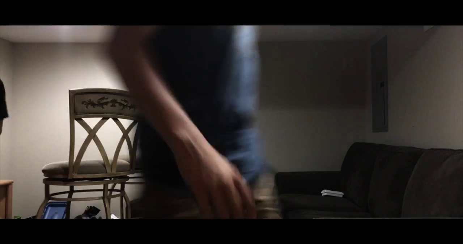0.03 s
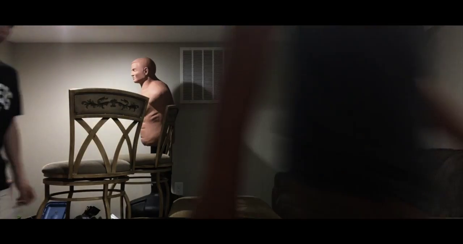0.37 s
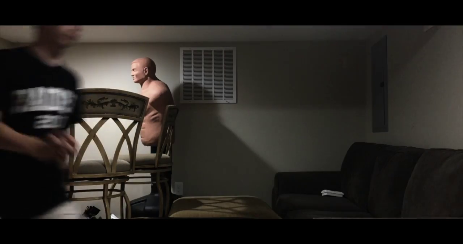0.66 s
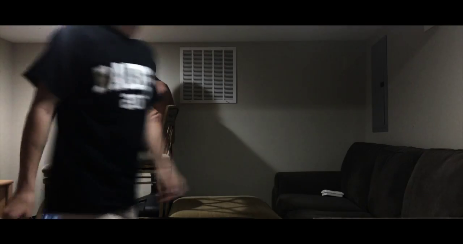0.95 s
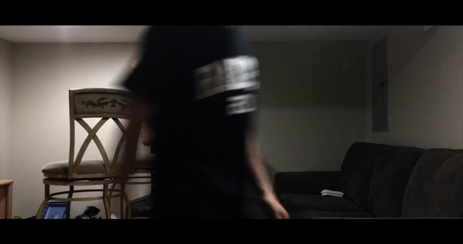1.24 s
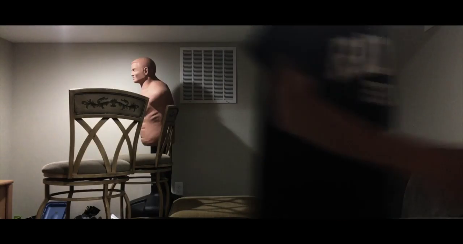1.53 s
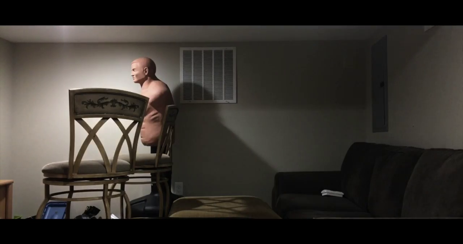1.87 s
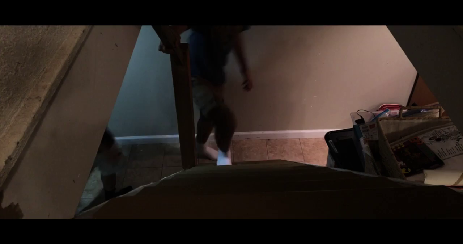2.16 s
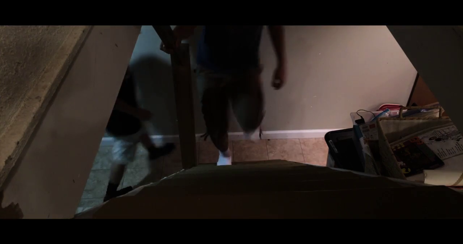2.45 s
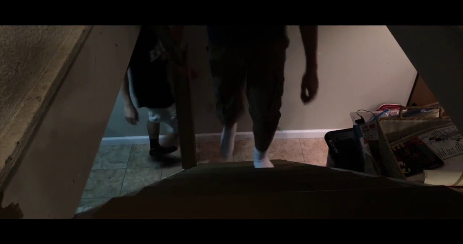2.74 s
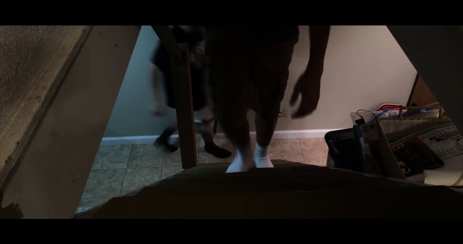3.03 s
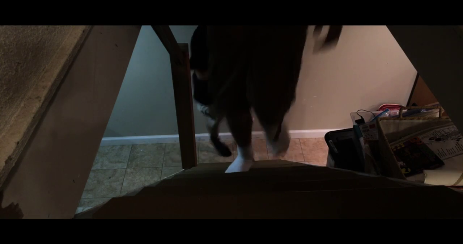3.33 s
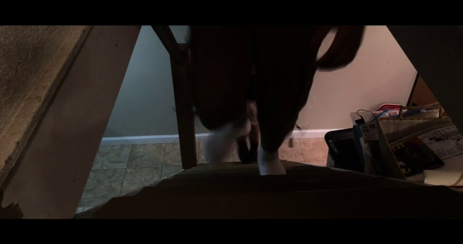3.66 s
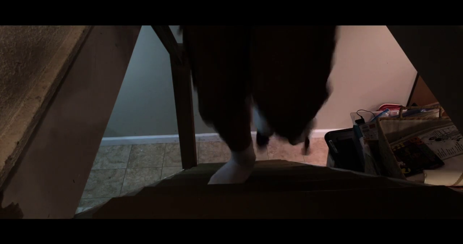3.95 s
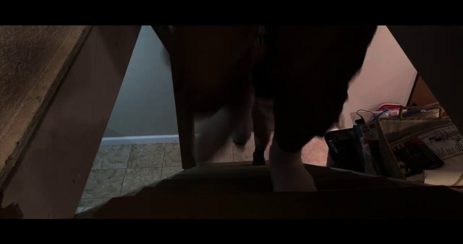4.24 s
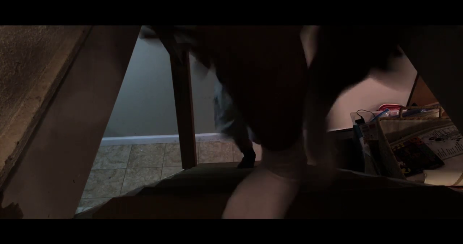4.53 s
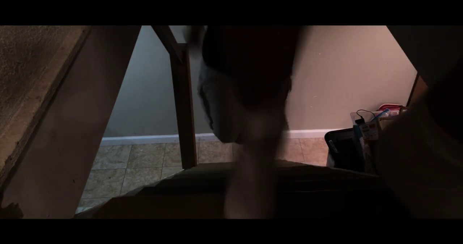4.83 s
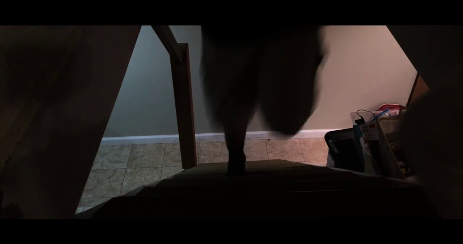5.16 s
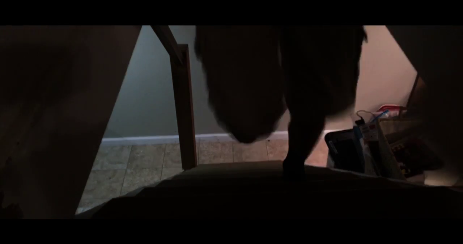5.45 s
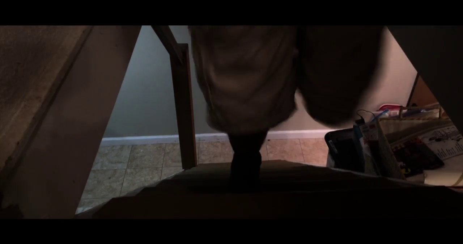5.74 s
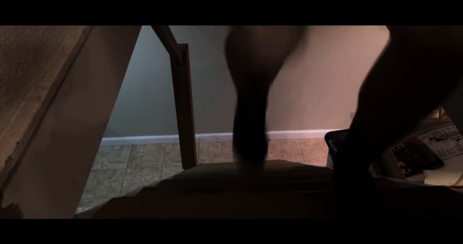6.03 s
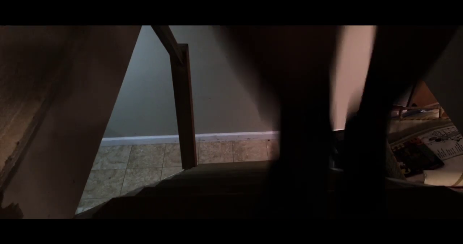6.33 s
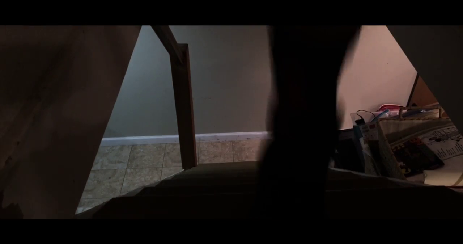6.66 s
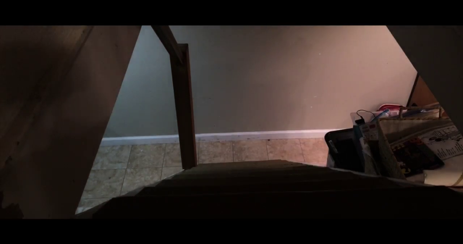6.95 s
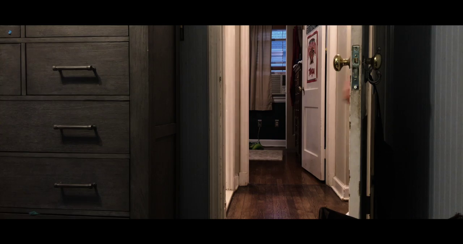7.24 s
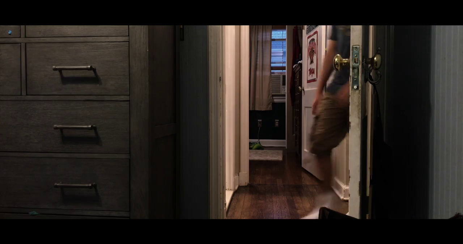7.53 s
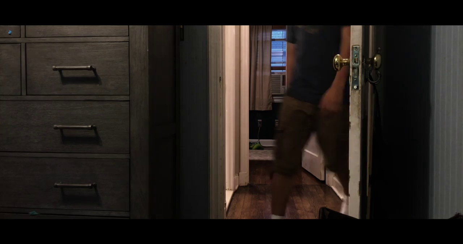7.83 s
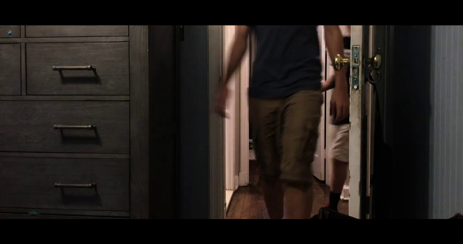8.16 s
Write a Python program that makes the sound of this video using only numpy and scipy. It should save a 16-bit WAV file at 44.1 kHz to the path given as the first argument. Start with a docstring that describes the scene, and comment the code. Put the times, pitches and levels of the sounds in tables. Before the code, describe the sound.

Over a faint indoor hum, soft footfalls give way to sharp cracks of wood and uneven, muffled thuds as two people in socks come up a staircase toward the microphone. The steps grow closer and drier, with rustling trousers and one deep boom from a heavy heel. After a faint click the hum drops, and low, booming steps continue on a wooden floor.

```python
"""Soft, thudding footsteps and cracking wood: two people in socks cross a basement and climb a carpeted
wooden staircase close past the listener; with a faint click the sound switches abruptly to the wooden
floor upstairs. Each footfall on the stairs thuds on a tread, knocks its boards and sets the flight
swaying; joints crack under the load, and heavy heels make the joists boom. Socks and trousers swish
between the steps, over a faint house hum."""
import sys
import numpy as np
from scipy import signal
from scipy.fft import rfft, irfft
from scipy.io import wavfile

SR = 44100
rng = np.random.default_rng(int(sys.argv[2]) if len(sys.argv) > 2 else 0)


def master_out(mix):
    """Clip the mix to full scale and print it as 16-bit PCM to the path in sys.argv[1]."""
    frames = np.transpose(np.atleast_2d(mix))
    ceiling = np.clip(frames, -1, 1)
    pcm = np.round(ceiling * 32767).astype(np.int16)
    wavfile.write(sys.argv[1], SR, pcm)


N = 369999

# ball and heel of each foot landing:
# (time [s], thud [dB], tread pitch [Hz], flex of the flight [dB], board knock [dB])
FOOTFALLS = [(1.534, -26, 202, -26.5, -27.5), (1.593, -29, 170, -22.5, -34.5), (2.115, -21, 211, -31, -24),
             (2.13, -11.5, 112, -16, -22.5), (2.235, -20.5, 142, -25.5, -30), (2.262, -25.5, 124, -18, -40),
             (2.713, -9.5, 163, -18, -22.5), (2.737, -17, 158, -15.5, -30), (3.096, -30, 187, -36, -42.5),
             (3.117, -29, 238, -46, -39.5), (3.461, -27, 300, -33, -28.5),
             (3.497, -19.5, 112, -15.5, -26.5), (3.53, -19.5, 114, -16.5, -30),
             (3.731, -34, 134, -31, -37.5), (3.79, -27.5, 124, -39, -32.5), (3.822, -13.5, 186, -25, -31),
             (4.146, -26, 139, -22, -32), (4.206, -8.5, 138, -22, -21.5), (4.424, -30.5, 225, -32, -54),
             (4.516, -24, 138, -32, -35), (4.759, -8.5, 161.5, -27.5, -22.5), (4.805, -22, 183, -44, -31),
             (4.853, -15.5, 227, -23.5, -22), (4.873, -17, 181, -38, -52), (5.021, -26, 224, -21.5, -32.5),
             (5.046, -24.5, 106, -37, -30), (5.073, -29, 132, -25, -35), (5.346, -8, 176, -20.5, -20),
             (5.451, -16, 128, -11, -28), (5.673, -14, 131, -27, -28), (6.034, -10, 135, -27, -19),
             (6.19, -24, 134, -30, -38.5), (6.388, -13.5, 214.6, -28.5, -35), (6.405, -22, 219, -40, -36.5),
             (6.762, -28, 299, -32, -29.5), (6.786, -22, 293, -30, -33.5), (6.812, -28, 124, -34, -47),
             (7.22, -22.5, 155, -25, -41.5)]


def footsteps():
    """Each foot thuds on its tread, knocks the boards, flexes the flight and scuffs the carpet."""
    # modes of the flight, the boards and the hollow under the treads: (pitch [Hz], level [dB], t60 [s])
    flight_modes = [(35.05, -2, 0.9), (54.2, -5, 0.23), (72.16, 7.5, 0.4), (91, -22, 0.55)]
    board_modes = [(233.7, 1.5, 0.16), (283.5, 0, 0.062), (315.5, 1.5, 0.096), (356, 0.5, .12),
                   (420.3, -6, 0.1), (505, -5, 0.039), (627, -7, 0.063)]
    hollow_modes = [(121.6, 7, 0.13), (154.4, -8, 0.087), (187, -2, 0.09)]
    # tone of a sock on carpet: (frequency [Hz], level [dB])
    scuff_tone = [(200, -2), (450, 9), (800, 3.5), (1500, 2), (3000, -5.5), (6000, -13.5), (16000, -19)]
    firm_db, firm_rise_s, db_per_doubling = -26.5, 0.0028, 17.5
    treads, flight, boards, scuff = np.zeros((4, N))
    flex = ring(flight_modes, rise_s=0.0022)
    t = np.arange(SR // 2) / SR
    for s, thud_db, hz, flex_db, knock_db in FOOTFALLS:
        rise_s = firm_rise_s * 2 ** ((firm_db - knock_db) / db_per_doubling)  # gentler foot, slower attack
        add(treads, s, amp(thud_db) * thud(hz, load_s=0.0065, steep=1.65))
        add(flight, s, amp(flex_db) * flex)
        add(boards, s, amp(knock_db) * ring(board_modes, rise_s, detune=0.058))
        add(scuff, s, amp(knock_db - 11) * pulse(t, 1.1 * rise_s, fade_s=0.026))
    steps = amp(-1.5) * treads + amp(5) * boards + scuff * noise(scuff_tone)
    echo = stairwell(amp(-2.5 + 0.35 * echo_db(np.arange(N) / SR)) * steps)
    return steps + resonate(treads, hollow_modes) + amp(1.5) * flight + echo


def joist_booms():
    """A heavy heel bends the joists: a deep boom with a weaker, quicker overtone; the floor swings on."""
    # heavy heels: (time [s], level [dB], pitch [Hz])
    heels = [(0.532, -30.5, 41.6), (1.112, -32, 44.5), (1.557, -39, 75.5), (5.455, -11, 46),
             (6.795, -26, 40.5), (7.151, -34, 69.4), (7.226, -15, 58.3), (7.281, -22.5, 53.4),
             (7.63, -27.5, 63), (7.84, -17.5, 54), (7.937, -28, 55), (8.127, -19.5, 55.7),
             (8.178, -23.5, 71.5)]
    # modes of the joists: (pitch [Hz], level [dB], t60 [s])
    joist_modes = [(51.6, -6.5, 0.45), (65.5, -5.5, 0.63)]
    booms = np.zeros(N)
    for s, db, hz in heels:
        load_s = 1.04 / hz  # the full weight arrives in about one swing
        add(booms, s, amp(db) * thud(hz, load_s, steep=1.2))
        add(booms, s, amp(db - 21) * thud(hz * 2.44, load_s / 2, steep=0.71))
    return amp(-2) * booms + resonate(booms, joist_modes) + amp(-16.5) * stairwell(booms)


def cracks_and_click():
    """Short noise bursts, wetter when far off: wood joints slipping, then one click at the room switch."""
    # cracking wood; the last row is a faint dry click as the sound switches abruptly to the upstairs room:
    # (time [s], level [dB], relative treble [dB])
    bursts = [(1.1193, -26.5, -28), (1.5328, -20, -13), (1.5956, -21, -24), (1.651, -29.5, -15),
              (1.714, -33, -34), (2.075, -26.5, -22), (2.112, -15.5, -26), (2.2383, -24, -12),
              (2.3248, -14, -7.5), (2.359, -17.5, -14.5), (2.4536, -14, -11.5), (2.4593, -19.5, -30),
              (2.6122, -10, -8.5), (2.7142, -14.5, -18), (2.7671, -18.5, -6), (4.2025, -27, -35),
              (4.5476, -15, -14), (4.867, -16.5, -8), (4.8714, -17.5, -14.5), (5.447, -20, -11),
              (5.451, -10.5, -10.5), (5.4986, -24, -10), (5.671, -20, -15), (6.0343, -21, -26),
              (6.272, -24.5, -22), (6.3872, -22.5, -15.5), (6.4214, -19.5, -28), (6.488, -22, -27),
              (6.682, -26, -14), (6.7074, -23.5, -16), (6.7289, -26.5, -4), (6.758, -19, -22),
              (6.783, -15, -20), (6.8208, -34, -7), (6.862, -31, -8), (6.887, -20, -25.5),
              (7.1565, -31.5, -27)]
    # tone of a burst's body, its bright snap and its echo: (frequency [Hz], level [dB])
    body_tone = [(200, -27), (600, -3), (1000, 9), (1500, 3), (2400, 4), (4100, -8.5), (5500, -1.5),
                 (8000, -10.5), (16000, -30)]
    snap_tone = [(1500, -4), (4000, -0.5), (6000, -3), (7500, -7), (9000, -2.5), (10400, -9), (12000, -5.5),
                 (16000, -14.5)]
    echo_tone = [(200, -14), (600, -1.5), (1000, -4.5), (1400, 4.5), (2400, 0.5), (4400, -3.5),
                 (5400, -7.5), (8000, -13), (16000, -29)]
    # woody ring after a burst: (pitch [Hz], level [dB], t60 [s])
    ring_modes = [(1580, -8, 0.021), (1782, 8, 0.1), (2380, 10, 0.059), (2826, 9, 0.086), (3470, 11, 0.017),
                  (4170, 11, 0.027)]
    typical_db, typical_fade_s, db_per_doubling = -15.5, 0.0028, 16
    body, snap, body_echo, snap_echo = np.zeros((4, N))
    t = np.arange(SR // 2) / SR
    for s, db, treble_db in bursts:
        fade_s = typical_fade_s * 2 ** ((db - typical_db) / db_per_doubling)  # louder bursts last longer
        burst = pulse(t, 0.42 * fade_s, fade_s)
        add(body, s, amp(db) * burst)
        add(snap, s, amp(db + treble_db) * burst)
        wet_db = db + echo_db(s)
        # echoes add in power, and the treble dies first
        add(body_echo, s, (amp(wet_db) * pulse(t, rise_s=0.004, fade_s=0.04)) ** 2)
        add(snap_echo, s, (amp(wet_db + treble_db) * pulse(t, rise_s=0.004, fade_s=0.026)) ** 2)
    sound = amp(-7) * body * noise(body_tone) + amp(7.5) * snap * noise(snap_tone)
    sound += amp(-9.5) * np.sqrt(body_echo) * noise(echo_tone)
    sound += amp(1.5) * np.sqrt(snap_echo) * noise(snap_tone)
    return sound + amp(-10) * resonate(sound, ring_modes)


def flight_sway():
    """The loaded flight heaves with a low rumble, most at first, and every footfall rocks it further."""
    # tone of the heaving staircase: (frequency [Hz], level [dB])
    sway_tone = [(15, -12.5), (27, -8), (33, -2.5), (38, -12), (44, -7.5), (70, -21), (200, -41), (600, -73)]
    start_s, rise_s, sway_db, fade_db_per_s = 2.72, 0.049, -29.5, 3
    t = np.arange(N) / SR
    since = np.maximum(t - start_s, 0)
    power = (amp(sway_db - fade_db_per_s * since) * (1 - np.exp(-since / rise_s))) ** 2
    rock = amp(-11.5) * pulse(t[:2 * SR], rise_s=0.04, fade_s=0.16)
    for s, _, _, flex_db, _ in FOOTFALLS:
        add(power, s, (amp(flex_db) * rock) ** 2)
    return np.sqrt(power) * noise(sway_tone)


def knocks_and_squeaks():
    """Loose wood chatters on its neighbour, or a sock on the floor: a cluster of modes around one pitch."""
    # hollow knocks of loose boards and trim: (time [s], level [dB], pitch [Hz])
    knocks = [(.537, -46.5, 1330), (1.120, -35.5, 935), (1.535, -37, 950), (1.660, -39, 690),
              (1.728, -37.5, 910), (2.077, -39, 440), (4.205, -33.5, 676), (4.213, -30, 1390),
              (4.379, -46, 2020), (4.547, -37.5, 1010), (5.45, -26.5, 1700), (5.348, -33.5, 477),
              (5.451, -34.5, 970), (6.038, -36, 1050), (6.104, -46, 1170), (6.488, -41.5, 1480),
              (6.837, -50, 840), (6.886, -49, 910), (6.943, -51.5, 1400)]
    # socks squeaking on the wooden floor: (time [s], level [dB], pitch [Hz], t60 [s])
    squeaks = [(7.262, -47, 1420, 0.17), (7.279, -44, 2900, 0.11), (7.845, -54, 980, 0.2),
               (7.86, -53, 3520, .12), (8.126, -55.5, 1233, 0.97)]
    knock_cycles = 63  # swings until a knock has died by 60 dB
    hits = [(s, db, hz, knock_cycles / hz) for s, db, hz in knocks] + squeaks
    sound, t = np.zeros(N), np.arange(SR // 2) / SR
    for s, db, hz, t60 in hits:
        q = 3.8 + 0.013 * hz * t60  # the longer the ring, the narrower the cluster
        cluster = signal.lfilter(*signal.iirpeak(hz, q, SR), rng.standard_normal(len(t)))
        cluster = signal.lfilter(*signal.iirpeak(hz, Q=1.3, fs=SR), cluster)
        add(sound, s, amp(db - 60 * t / t60) * evened(cluster))
    return amp(4.5) * sound + amp(-9.5) * stairwell(sound)


def cloth():
    """Socks slide in strokes that start fast and ease off; trousers rub, and fibres catch and let go."""
    # socks sliding over carpet and floor: (time [s], length [s], slide [dB], fizz [dB])
    strokes = [(-.02, .13, -52, -62), (.42, 0.21, -56, -79), (0.529, 0.098, -63, -55.5),
               (0.87, 0.098, -58, -54.5), (1.131, 0.12, -57, -51), (1.648, 0.053, -38.5, -49),
               (1.698, 0.087, -36, -56), (1.899, 0.097, -53, -54), (3.18, 0.18, -40.5, -44.5),
               (3.376, 0.2, -42, -55.5), (3.474, 0.026, -42, -46), (3.523, 0.15, -39, -51.5),
               (4.525, 0.083, -53, -56), (4.784, 0.17, -40, -46), (4.93, 0.26, -44.5, -72),
               (5.387, 0.23, -55, -54), (6.25, 0.26, -49, -50.5), (6.967, 0.099, -80, -54),
               (7.256, 0.17, -40, -72), (7.483, 0.22, -51.5, -64), (7.596, 0.24, -46, -59),
               (7.798, 0.15, -44, -56.5), (8.016, 0.16, -56.5, -57.5), (8.096, 0.44, -56.5, -70)]
    # tone of trouser swish, sock slide and fibre fizz: (frequency [Hz], level [dB])
    swish_tone = [(150, 8), (350, 14.5), (500, 11), (630, 13), (820, -2), (1400, 8.5), (1850, -15),
                  (2170, -5), (2600, -24), (3600, 0), (4150, -2.5), (5200, -47), (9000, -19)]
    slide_tone = [(200, 10), (500, 2), (720, -2), (1100, -1.5), (1500, 1.5), (1900, -2.5), (2200, 0),
                  (2600, -3), (3000, -4.5), (3600, -5), (4200, -6), (5500, -12.5), (9000, -23)]
    fizz_tone = [(2000, 2.5), (4500, 0.5), (6500, 2), (9000, -1.5), (10400, -5), (12000, -1), (16000, -5)]
    # what a sliding sock rings between tread and riser: (pitch [Hz], level [dB], t60 [s])
    riser_modes = [(670, 10, 0.04), (1110, 4, 0.024), (2100, 4, 0.012), (4170, 6, 0.026)]
    on_stairs = np.interp(np.arange(N) / SR, [3.02, 3.08, 7.0, 7.17], [0, 1, 1, 0])
    legs = amp(-4) * on_stairs * trouser_rub()
    slide, fizz = np.zeros((2, N))
    for s, length_s, slide_db, fizz_db in strokes:
        progress = np.arange(SR // 2) / SR / length_s
        stroke = 1.034 * (1 - np.exp(-progress / 0.053)) * np.exp(-(progress / 0.75) ** 2.8)
        add(slide, s, amp(slide_db) * stroke)
        add(fizz, s, amp(fizz_db) * stroke)
    grip = amp(wander(rate_hz=43))
    catches = amp(2.2 * wander(rate_hz=880))
    trousers = (amp(-4) * legs + amp(-6) * on_stairs * slide) * noise(swish_tone)
    socks = amp(-3.5 * on_stairs) * slide * noise(slide_tone)  # the carpet swallows part of the hiss
    fibres = (legs + fizz) * noise(fizz_tone)
    rub = grip * catches * (trousers + socks + fibres)
    rub += resonate(on_stairs * slide * grip * noise(slide_tone), riser_modes)
    return rub + amp(-11) * stairwell(rub)


def trouser_rub():
    """Envelope of rubbing trouser legs: a steady bed that swells as each walker brushes past."""
    # close passes: (time [s], level [dB], time to cover their distance from the listener [s])
    passes = [(4.7, -50, 0.29), (6.55, -49, 0.1)]
    t = np.arange(N) / SR
    near_power = sum(amp(db) ** 2 / (1 + ((t - s) / span_s) ** 2) for s, db, span_s in passes)
    return np.sqrt(amp(-52) ** 2 + near_power)


def house_tone():
    """Air rumbles and hisses; a basement machine's hum gathers in the stairwell. All drop upstairs."""
    # tone of the air's rumble and hiss: (frequency [Hz], level [dB])
    rumble_tone = [(15, -4.5), (28, -7), (43, 2), (60, -6.5), (90, -4.5), (130, -6.5), (200, -10.5),
                   (370, -15.5), (520, -24), (1000, -53), (3000, -57)]
    hiss_tone = [(300, -1), (1000, 1.5), (2500, -3.5), (4500, -7.5), (8000, -10), (10400, -11.5),
                 (12000, -11), (16000, -10)]
    hum_hz = 118.5
    t = np.arange(N) / SR
    past_basement = np.interp(t, [2.05, 2.1], [0, 1])
    upstairs = np.interp(t, [7.15, 7.17], [0, 1])
    hum_db = -50 + 2.6 * wander(rate_hz=3) + 7.9 * past_basement - 14.4 * upstairs
    rumble = amp(-45.5 - 6 * upstairs) * noise(rumble_tone)
    hiss = amp(-57 - 2.3 * upstairs) * noise(hiss_tone)
    return rumble + hiss + amp(hum_db) * np.sin(2 * np.pi * hum_hz * t)


def stairwell(x):
    """Stairwell reverb: dense echoes of random sign, each band dying at its own speed."""
    # decay of the stairwell: (frequency [Hz], t60 [s])
    decay = [(60, 0.68), (200, 0.2), (800, 0.36), (2100, 0.14), (5500, 0.081), (14000, 0.051)]
    echoes_per_s, predelay_s = 5000, 0.002
    taps = rng.choice([-1., 1.], SR) * (rng.random(SR) < echoes_per_s / SR)
    taps *= np.arange(SR) > predelay_s * SR
    hz, t, bands = signal.stft(taps, SR, nperseg=256)
    bands *= amp(-60 * t / curve(decay, hz)[:, None])
    tail = signal.istft(bands, SR, nperseg=256)[1]
    return signal.fftconvolve(x, tail / np.linalg.norm(tail))[:N]


def echo_db(s):
    """Reverb send at time s, which falls as the walkers come closer."""
    # the walkers' distance, heard as echo: (time [s], echo over direct sound [dB])
    distance = [(1.0, -22), (2.3, -6), (2.8, -3.5), (4.2, -12), (4.8, -15), (6.0, -21.5), (6.4, -15.5)]
    return np.interp(s, *np.transpose(distance))


def thud(hz, load_s, steep):
    """A panel damped by the foot on it: a few cycles that swell until the full load is on, then die."""
    t = np.arange(SR // 2) / SR
    u = t / load_s
    return (u * np.exp(1 - u)) ** steep * np.sin(2 * np.pi * hz * t)


def ring(modes, rise_s, detune=0):
    """Modes set going by a soft push, peak 1; neighbours swing opposite ways."""
    t = np.arange(SR) / SR
    sound = np.zeros(SR)
    for k, (hz, db, t60) in enumerate(modes):
        hz *= 1 + detune * rng.uniform(-1, 1)  # no two boards are cut alike
        sound += (-1) ** k * amp(db - 60 * t / t60) * np.sin(2 * np.pi * hz * t)
    sound *= 1 - np.exp(-(t / rise_s) ** 2)
    return sound / abs(sound).max()


def resonate(x, modes):
    """What a sound leaves ringing in a set of modes."""
    return sum(amp(db) * signal.lfilter(*signal.iirpeak(hz, hz * t60 / 2.2, SR), x)
               for hz, db, t60 in modes)


def pulse(t, rise_s, fade_s):
    """Envelope with exponential attack and decay."""
    return (1 - np.exp(-t / rise_s)) * np.exp(-t / fade_s)


def noise(tone):
    """Steady noise of rms 1 with the given spectrum."""
    gain = amp(curve(tone, np.fft.rfftfreq(N, 1 / SR)))
    return evened(irfft(rfft(rng.standard_normal(N)) * gain, N))


def wander(rate_hz):
    """Random drift of rms 1, no faster than rate_hz."""
    return evened(irfft(rfft(rng.standard_normal(N)) * (np.fft.rfftfreq(N, 1 / SR) < rate_hz), N))


def curve(points, hz):
    """Points joined by straight lines over log frequency."""
    f, value = np.transpose(points)
    return np.interp(np.log(hz + 1), np.log(f + 1), value)


def add(mix, s, sound):
    """Mixes a sound in at time s."""
    part = mix[max(round(s * SR), 0):][:len(sound)]
    part += sound[:len(part)]


def amp(db):
    """Decibels to gain."""
    return 10 ** (np.asarray(db) / 20)


def evened(x):
    """Scaled to rms 1."""
    return x / np.sqrt(np.mean(x ** 2) + 1e-20)


def scene():
    """All layers in one mono mix."""
    walking = footsteps() + flight_sway() + joist_booms()
    return (walking + cracks_and_click() + knocks_and_squeaks() + cloth() + house_tone())[None]


def record(dry):
    """A steep low-pass trims the very top."""
    lowpass = signal.firwin(511, cutoff=16150, window=("kaiser", 9), fs=SR)
    return signal.oaconvolve(dry, lowpass[None], "same")


dry = scene()
out = record(dry)
master_out(out)
```